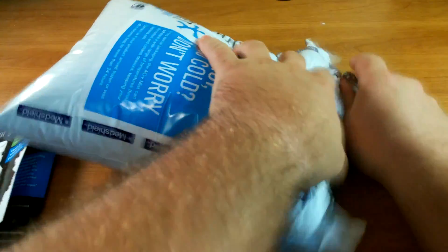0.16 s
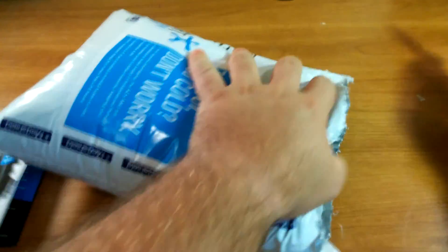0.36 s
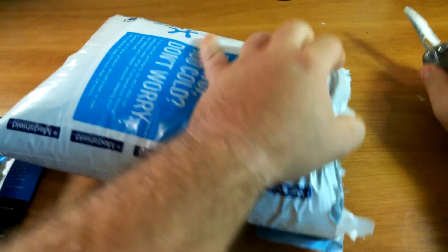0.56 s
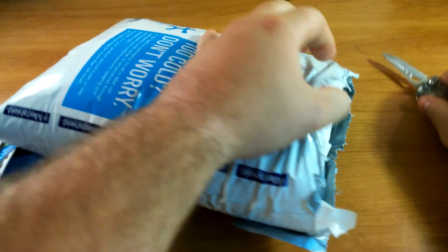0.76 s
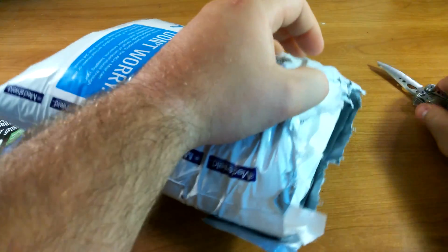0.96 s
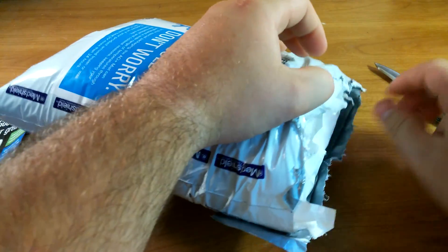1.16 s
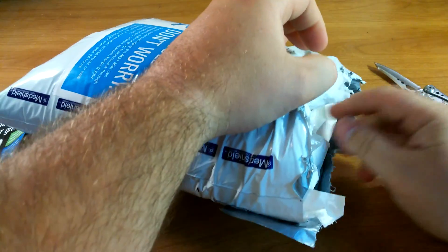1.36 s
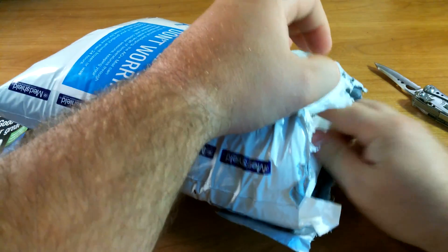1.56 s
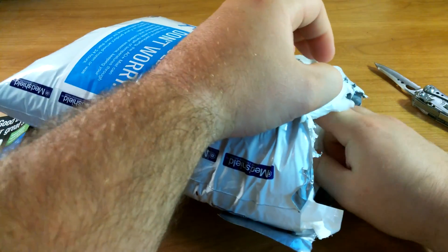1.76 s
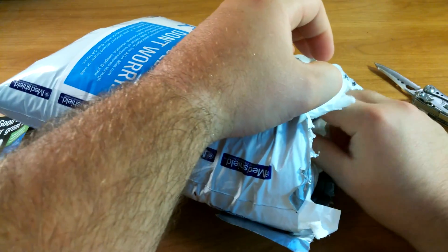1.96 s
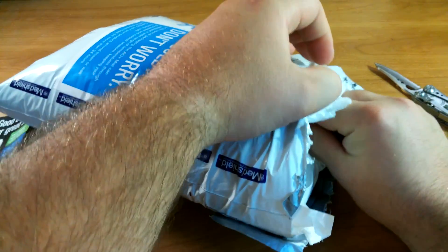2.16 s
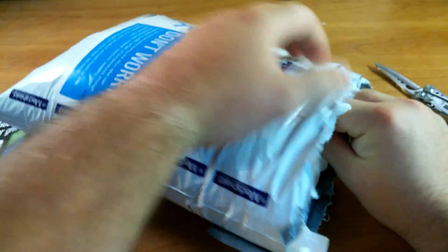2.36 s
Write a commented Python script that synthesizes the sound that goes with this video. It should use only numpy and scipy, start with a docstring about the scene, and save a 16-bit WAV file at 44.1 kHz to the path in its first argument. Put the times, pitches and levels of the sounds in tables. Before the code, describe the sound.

A plastic mailer crinkles, rips quickly under a knife and thumps onto a wooden table. The knife clatters down, then fingers pry at the slit with hollow pops and bright snaps, close up in a small, quiet room.

```python
"""A plastic mailer on a wooden table in a small, quiet room, close to a stereo microphone.
First the film crinkles as a knife works at its edge and rips through in a fast run of fractures.
The parcel thumps down and rustles as it settles. The knife is laid down with a short clatter that
rings the table top. Last, fingers pry into the slit: creases buckle with hollow pops and bright snaps."""
import sys
import numpy as np
from scipy import signal
from scipy.fft import rfft, irfft, next_fast_len
from scipy.io import wavfile
from scipy.ndimage import uniform_filter1d, map_coordinates

SR = 44100
rng = np.random.default_rng(int(sys.argv[2]) if len(sys.argv) > 2 else 0)


def dump(signal):
    """Clip the signal to [-1, 1] and save it as 16-bit WAV at the path in sys.argv[1]."""
    limited = np.clip(np.atleast_2d(signal).T, -1, 1)
    pcm = np.round(limited * 32767).astype(np.int16)
    wavfile.write(sys.argv[1], SR, pcm)


N = 105840
T = np.arange(N) / SR

# room tone (frequency [Hz], level [dB])
ROOM_TONE_COLOUR = [(20, -16), (120, 1), (350, 3), (800, -12.5), (8000, -24)]
# the room's reverberation (frequency [Hz], T60 [s])
ROOM_DECAY = [(2000, .34), (8000, 0.41), (16000, 0.14)]
# likeness of left and right at the microphone (frequency [Hz], correlation [0..1])
MIC_LIKENESS = [(100, 0.74), (400, 0.97), (1000, .45), (2500, .35)]
# balance at the microphone (frequency [Hz], left minus right [dB])
MIC_BALANCE = [(300, -0.1), (600, 1.6), (3000, -1), (9000, -11), (14000, -4)]
# the parcel rocking (frequency [Hz], level [dB])
RUMBLE_COLOUR = [(20, -14), (55, -2), (120, -7.5), (400, -60.5)]
# the table top's low modes and its dense higher ones (frequency [Hz], level [dB])
TABLE_MODES = [(118, -1.5), (205, -10), (245, -10.5), (328, -1), (440, -8), (544, -9), (807, 3.5), (845, 2),
               (1007, -5), (1211, -11), (1464, -15)]
WOOD_COLOUR = [(40, -31), (200, -15.5), (400, 1), (700, -11), (950, -6), (2200, -11), (3500, -21.5),
               (16000, -61)]
# the knife's metal click (frequency [Hz], level [dB])
CLICK_COLOUR = [(900, -11), (6000, 8), (16000, -23.5)]
# the knife hitting the table (time [s], strength [dB], contact [ms], click level [dB])
KNIFE_BLOWS = [(0.8680, -15.5, 0.064, -36), (0.884, -22.5, 0.063, -37.5), (0.9074, -18, 0.19, -36.5),
               (0.9163, -22.5, 0.11, -58), (0.943, -27, 0.21, -37.5), (.9735, -27, 0.12, -35),
               (1.061, -18, 0.3, -58), (1.087, -23.5, 0.11, -42), (1.099, -30.5, 0.11, -44),
               (1.235, -46, .18, -60)]
# the film's hollow pops, bright snaps, fine ticks and tearing (frequency [Hz], level [dB])
POP_COLOUR = [(30, -29.5), (110, -13), (180, -13), (400, -1), (670, -10), (900, -3), (1300, -6),
              (2000, -10), (3200, -14), (12000, -58)]
SNAP_COLOUR = [(100, -51), (900, -21.5), (2200, -4), (4500, 4), (9000, -3), (12500, -8), (16000, -8.5)]
TICK_COLOUR = [(100, -44.5), (900, -12.5), (2000, 1), (4300, 5), (9000, -8), (12500, -16.5), (16000, -18)]
TEAR_COLOUR = [(30, -27.5), (300, 7.5), (490, 3.5), (700, 2.5), (940, 6.5), (1200, -2), (1800, -2),
               (3400, -5.5), (9000, -6.5), (12500, -20.5), (16000, -24)]
# crinkling of the handled film (time [s], level [dB])
CRINKLE_LEVELS = [(0, -39.5), (.095, -44.5), (.115, -51), (.19, -49), (.203, -28), (.29, -32), (.37, -33.5),
                  (.44, -41), (.49, -31), (.55, -37.5), (.585, -46.5), (0.609, -39), (.69, -45),
                  (.715, -34.5), (.735, -53), (.86, -55), (.90, -38), (1.01, -49), (1.151, -55.5),
                  (1.246, -53.5), (1.275, -76), (1.31, -76), (1.35, -69), (1.517, -68), (1.53, -52.5),
                  (1.60, -55.5), (1.618, -41.5), (1.705, -49), (1.72, -42.5), (1.79, -41.5), (1.88, -59.5),
                  (1.925, -43), (2.0, -45), (2.06, -55.5), (2.14, -65), (2.169, -58.5), (2.22, -61),
                  (2.37, -63), (2.381, -39)]
# buckling creases; slack ones only pop and lack the last two columns
# (time [s], relative pop level [dB], pop pitch [Hz], relative snap level [dB], snap pitch [Hz])
BUCKLES = [(.006, -34, 865), (.016, -45, 2200, -38, 5900), (0.054, -35, 890), (.197, -23, 1117, -36, 8100),
           (.202, -24.5, 1580, -27.5, 7660), (0.348, -48, 1690, -31.5, 8400),
           (.377, -30.5, 1070, -38, 3000), (.384, -36, 1960, -24.5, 4000), (0.4034, -27.5, 830),
           (0.467, -29.5, 1060, -35, 8300), (.475, -24.5, 465), (.493, -18, 866, -33, 2980),
           (.596, -22.5, 876, -35, 2950), (.610, -28, 404), (.620, -30.5, 575),
           (.665, -38, 2210, -37, 5160), (0.7092, -33.5, 500, -42, 3020), (1.320, -52, 910, -57.5, 3020),
           (1.336, -57.5, 826, -54, 3020), (1.527, -44, 700), (1.536, -38.5, 392, -47.5, 5820),
           (1.555, -40.5, 1110, -37, 7300), (1.56, -44, 1900, -41, 4500), (1.586, -44, 298, -37.5, 8700),
           (1.612, -30, 440, -29.5, 2700), (1.656, -31.5, 1113, -32, 6650), (1.6597, -29.5, 1024),
           (1.691, -30, 970), (1.7167, -34, 1785, -35, 5140), (1.7355, -42, 1500, -38, 8500),
           (1.7497, -49, 1270, -25.5, 8900), (1.757, -36, 910, -30.5, 5860),
           (1.7742, -30.5, 1070, -28.5, 6000), (1.793, -27.5, 980, -34.5, 4800), (1.807, -30.5, 825),
           (1.841, -37, 950), (1.847, -35, 1414), (1.893, -45, 1250, -37.5, 3280),
           (1.915, -31, 1070, -46, 6200), (1.9201, -29.5, 840, -31.5, 6000), (1.935, -29.5, 944),
           (1.953, -22.5, 486, -32, 7550), (1.979, -33, 890, -38.5, 7650), (2.000, -37, 1110),
           (2.0167, -35, 960, -32, 4950), (2.078, -40, 383), (2.107, -47, 950),
           (2.161, -40, 378, -47, 5330), (2.169, -44, 480), (2.182, -39, 940),
           (2.213, -53, 2060, -51, 6950), (2.239, -49, 870), (2.312, -47, 420),
           (2.3766, -24.5, 884, -37, 8550)]


def amp(db):
    """Decibels to gain."""
    return 10 ** (np.asarray(db) / 20)


def read(points, hz):
    """Reads a table along log frequency."""
    f, value = np.transpose(points)
    return np.interp(np.log(hz + 1), np.log(f), value)


def unit_rms(x):
    """Scales to rms 1."""
    return x / np.sqrt(np.mean(x ** 2) + 1e-20)


def struck(x):
    """Scales a short sound to the energy of 2 ms at rms 1."""
    return x / np.sqrt(np.sum(x.mean(0) ** 2) / (.002 * SR) + 1e-20)


def add(mix, s, sound):
    """Mixes a sound in at time s."""
    part = mix[:, max(round(s * SR), 0):][:, :sound.shape[1]]
    part += sound[:, :part.shape[1]]


def ring(colour, peak_hz=1000, peak_db=0, roll_db_per_oct=0, width_oct=.43, size=4096):
    """Causal impulse response of a colour, with an optional resonance and a roll-off above it."""
    hz = abs(np.fft.fftfreq(size, 1 / SR))
    db = read(colour, hz) + peak_db * np.exp(-(np.log2((hz + 1) / peak_hz) / width_oct) ** 2)
    db -= roll_db_per_oct * np.log2(np.maximum(hz / peak_hz, 1))
    minimum_phase = np.exp(np.conj(signal.hilbert(np.log(amp(db)))))
    return np.fft.ifft(minimum_phase).real[None, :size // 2]


def through(x, response):
    """Convolves each channel."""
    return signal.fftconvolve(x, response, axes=1)[:, :N]


def spread(pair):
    """Makes two unrelated signals alike in the bass, less so in the treble."""
    size = next_fast_len(pair.shape[1] + 256)
    a, b = rfft(pair, size)
    same = np.clip(read(MIC_LIKENESS, np.fft.rfftfreq(size, 1 / SR)), 0, 1)
    mid, side = a * np.sqrt((1 + same) / 2), b * np.sqrt((1 - same) / 2)
    return irfft(np.array([mid + side, mid - side]), size)[:, :pair.shape[1]]


def noise(colour):
    """Steady stereo noise at rms 1."""
    return unit_rms(through(spread(rng.standard_normal((2, N))), ring(colour)))


def burst(envelope, response):
    """A short shiver with its own random resonances."""
    return struck(through(spread(rng.standard_normal((2, len(envelope))) * envelope), response))


def crackle(colour, per_s, spread_db, decay_s, hiss_db, facets=12):
    """Tiny random buckles of unequal size, each ringing one facet of film, over a sliding hiss; rms 1."""
    sizes = amp(spread_db * np.minimum(rng.exponential(1, N), 3))
    kicks = sizes * (rng.random(N) < per_s / SR)
    facet = rng.integers(0, facets, N)
    rings = rng.standard_normal((facets, 2, 512)) * np.exp(-T[:512] / decay_s)
    grains = sum(through((kicks * (facet == k))[None], rings[k]) for k in range(facets))
    hiss = amp(hiss_db) * rng.standard_normal((2, N))
    return unit_rms(through(spread(unit_rms(grains) + hiss), ring(colour)))


def room_tone():
    """The faint, low hush of the room."""
    return amp(-68.5) * noise(ROOM_TONE_COLOUR)


def room_reverb(x, build_s=.006):
    """The small room answers with a diffuse tail whose top treble dies first."""
    t = T[:22050]
    hz, when, spectra = signal.stft(rng.standard_normal((2, len(t))), SR, nperseg=256)
    decay = amp(-60 * when / read(ROOM_DECAY, hz)[:, None])
    tail = signal.istft(spectra * decay, SR, nperseg=256)[1][:, :len(t)]
    tail = spread(tail * np.minimum(t / build_s, 1))
    return through(x, tail / np.linalg.norm(tail[0]))


def parcel(land_s=.2213, thud_hz=123.6, rise_s=.022, rock_s=.35, rock_width_s=.13):
    """The soft parcel thuds on the table and rumbles as it rocks to rest."""
    t = np.maximum(T - land_s, 0)
    thud = (t / rise_s * np.exp(1 - t / rise_s)) ** 3 * np.sin(2 * np.pi * thud_hz * t)
    rocking = np.exp(-((T - rock_s) / rock_width_s) ** 2)
    return amp(-9.5) * thud + amp(-42) * rocking * noise(RUMBLE_COLOUR)


def knife_on_table(slide_s=1.2, rest_s=1.255, left_lag_s=.00014):
    """The knife strikes the wooden top, then slides to rest; shorter contacts ring higher modes."""
    lowest_t60_s, wood_decay_s, click_decay_s = .225, .018, .0044
    out, t = np.zeros((2, N)), T[:16384]
    wood, click = ring(WOOD_COLOUR), ring(CLICK_COLOUR)
    lowest_hz = TABLE_MODES[0][0]  # modes above it die sooner
    modes = np.array([amp(db - 60 * t / lowest_t60_s * (hz / lowest_hz) ** .33)
                      * np.cos(2 * np.pi * hz * t) for hz, db in TABLE_MODES])
    for s, db, contact_ms, click_db in KNIFE_BLOWS:
        contact = t[:1024] * 1000 / contact_ms
        push = contact * np.exp(-contact)
        spot_db = 2.5 * rng.uniform(-1, 1, len(modes))  # each blow lands on another spot
        low_modes = amp(spot_db - 5) @ modes
        high_modes = amp(7) * burst(np.exp(-t / wood_decay_s), wood)[:, :len(t)]
        add(out, s, amp(db) * through(low_modes + high_modes, push[None] / push.sum()))
        add(out, s, amp(click_db) * burst(np.exp(-t[:1024] / click_decay_s), click))
    sliding = uniform_filter1d(1. * ((T > slide_s) & (T < rest_s)), size=600)
    falling_still = amp(-300 * np.maximum(T - rest_s, 0))
    left, right = out * falling_still + amp(-49) * sliding * noise(WOOD_COLOUR)
    left = map_coordinates(left, [(T - left_lag_s) * SR])  # the knife lies right of the microphone
    return np.array([amp(.25) * left, amp(-.25) * right])  # the table is a little louder on the left


def crinkle(tick_growth=1.139):
    """Countless small pops and ticks as the film is moved; ticks grow faster under harder handling."""
    level_db = np.interp(T, *np.transpose(CRINKLE_LEVELS))
    pops = crackle(POP_COLOUR, per_s=350, spread_db=2, decay_s=.0024, hiss_db=-12.5)
    ticks = crackle(TICK_COLOUR, per_s=1300, spread_db=4.5, decay_s=.00052, hiss_db=-6)
    return pops * amp(level_db) + ticks * amp(tick_growth * level_db + .5)


def rip(free_s=.2265, rise_s=.003, hold_s=.008, fall_db_per_s=375.5, edge_db_per_s=135):
    """A very fast run of fractures peaks as the blade breaks free; the torn edge hisses on."""
    rise = np.exp(np.minimum(T - free_s, 0) / rise_s)
    fall = amp(-fall_db_per_s * np.maximum(T - free_s - hold_s, 0))
    torn_edge = amp(-29 - edge_db_per_s * np.maximum(T - free_s, 0)) * noise(SNAP_COLOUR)
    fractures = crackle(TEAR_COLOUR, per_s=5000, spread_db=3, decay_s=.00086, hiss_db=-2)
    return rise * (torn_edge + amp(-11) * fall * fractures)


def creases(followers_per_s=260):
    """Each crease pops the panel of film around it; taut ones also snap and set off smaller snaps."""
    panel_s, pop_s, snap_s, flutter_s, run_s = .0051, .0027, .00061, .0072, .012  # decay times
    out, t, pop = np.zeros((2, N)), T[:2048], ring(POP_COLOUR)
    snap_decay = np.exp(-t / snap_s)
    shiver = snap_decay + amp(-13) * np.exp(-t / flutter_s)  # the film shivers on after a snap
    for s, pop_db, pop_hz, *snap in BUCKLES:
        panel_note = np.sin(2 * np.pi * pop_hz * t) * np.exp(-t / panel_s)
        add(out, s, amp(pop_db - 2) * struck(panel_note[None]))
        add(out, s, amp(pop_db - 2) * burst(np.exp(-t / pop_s), pop))
        if snap:
            snap_db, snap_hz = snap
            followers = (rng.random(len(t)) < followers_per_s / SR) * np.exp(-t / run_s)
            run = amp(-9) * signal.fftconvolve(followers, snap_decay)[:len(t)]
            response = ring(SNAP_COLOUR, snap_hz, peak_db=9.5, roll_db_per_oct=2.5)  # low snaps are duller
            add(out, s, amp(snap_db + .5) * burst(np.hypot(shiver, run), response))
    return out


def scene():
    """Film and knocks close up, with a little of the room and its tone behind them."""
    film = creases() + crinkle() + rip()
    knocks = knife_on_table() + parcel()
    return film + knocks + room_reverb(amp(-15) * film + amp(-17.5) * knocks) + room_tone()


def record(dry):
    """The microphone's right side is nearer and hears more treble; then clipping and the band limit."""
    left_lag_s, edge_hz = .00008, 16200
    size = next_fast_len(N + 2048)
    hz = np.fft.rfftfreq(size, 1 / SR)
    lean = amp(read(MIC_BALANCE, hz) / 2)
    delay = np.exp(-2j * np.pi * hz * left_lag_s)
    channels = irfft(rfft(dry, size) * np.array([lean * delay, 1 / lean]), size)[:, :N]
    lowpass = signal.firwin(255, edge_hz, window=("kaiser", 9), fs=SR)
    return signal.oaconvolve(np.clip(channels, -1, 1), lowpass[None], "same")


dry = scene()
out = record(dry)
dump(out)
```